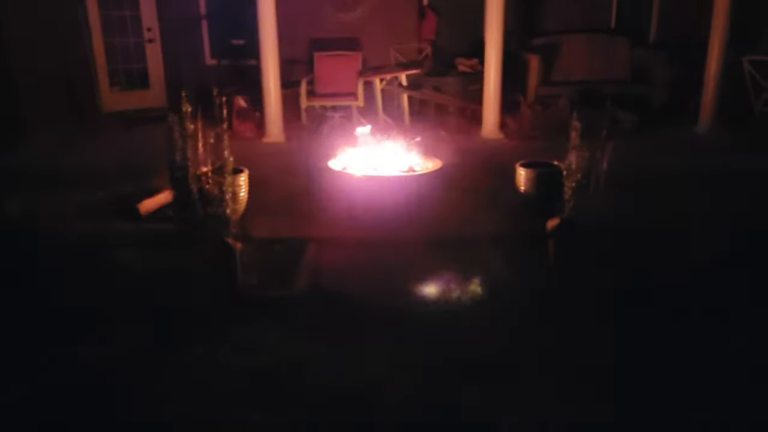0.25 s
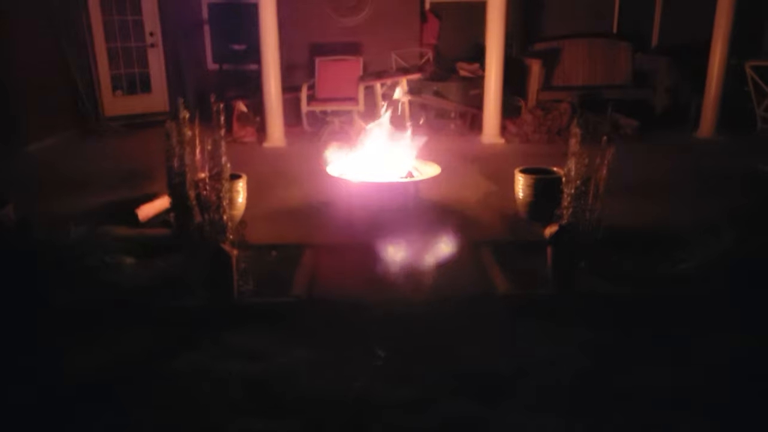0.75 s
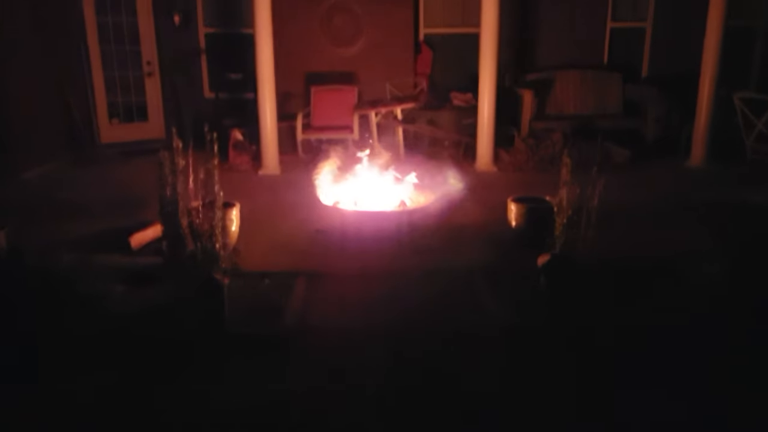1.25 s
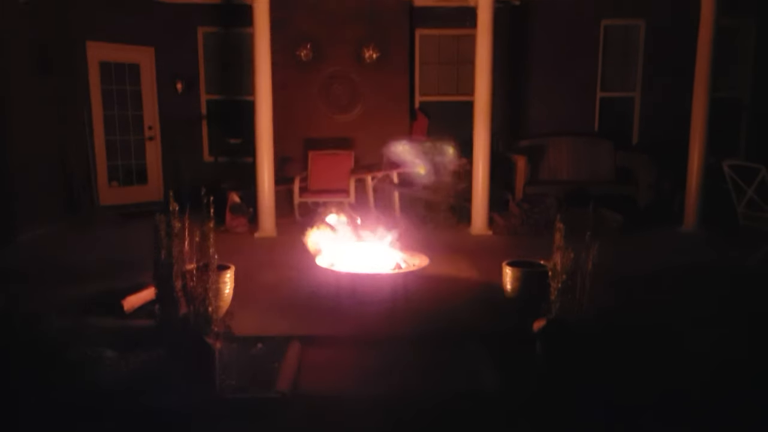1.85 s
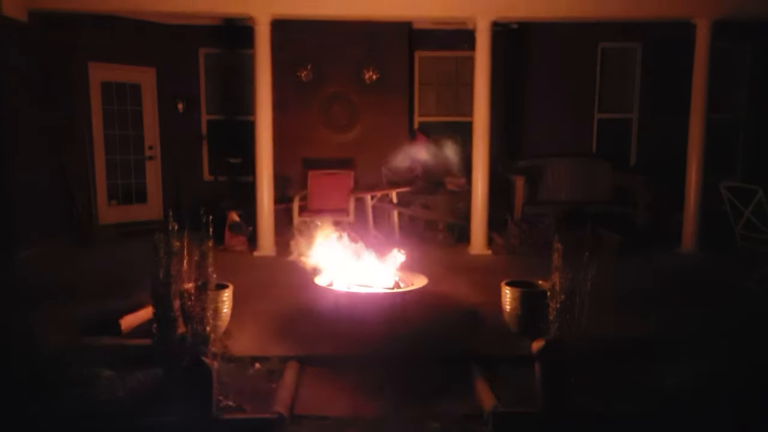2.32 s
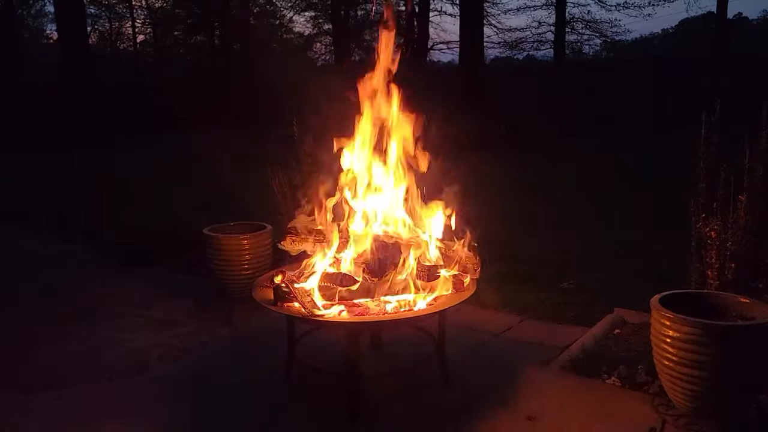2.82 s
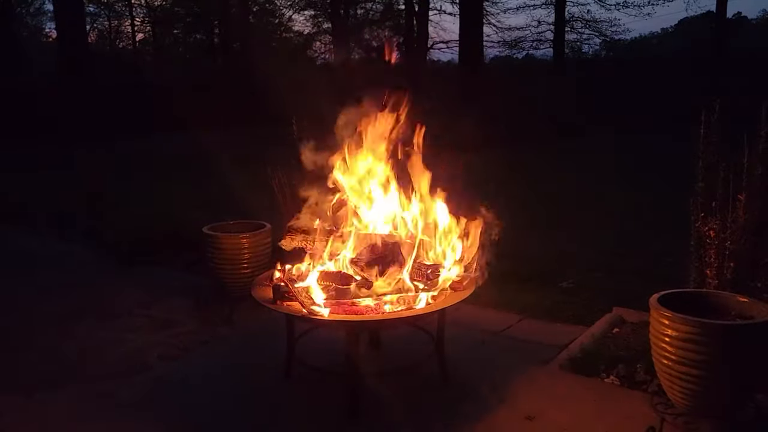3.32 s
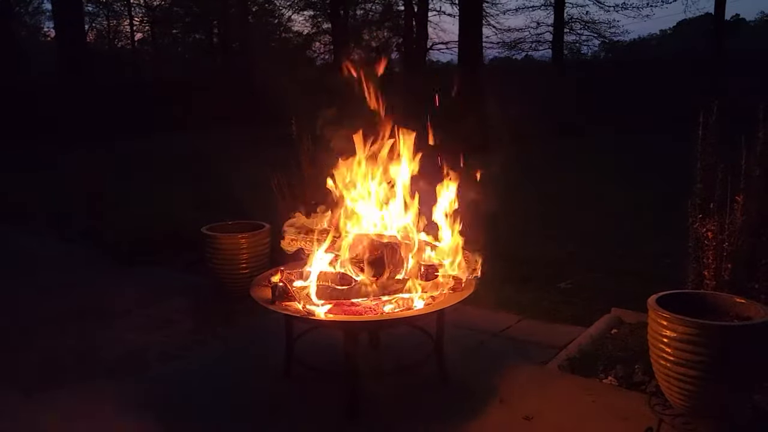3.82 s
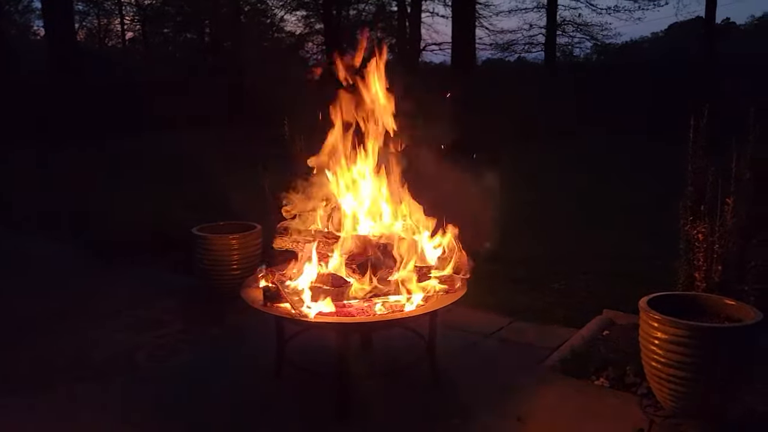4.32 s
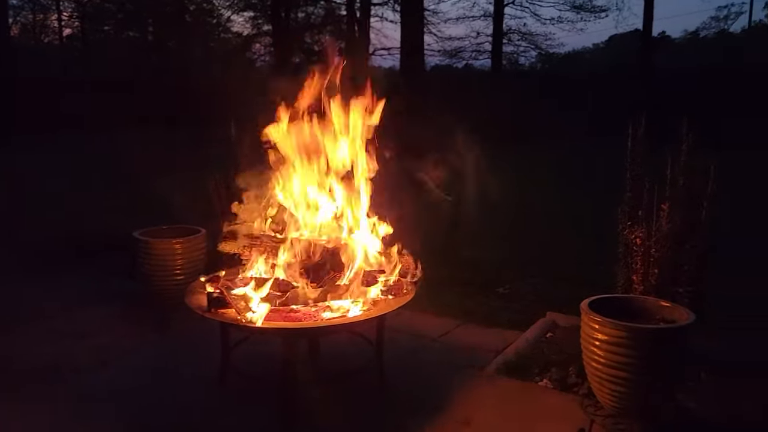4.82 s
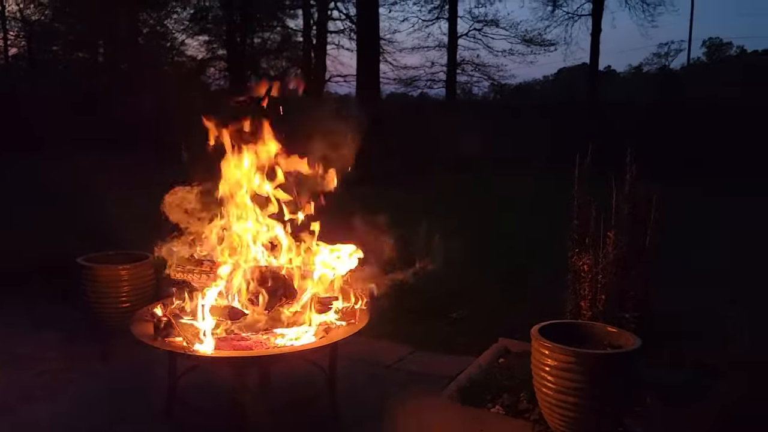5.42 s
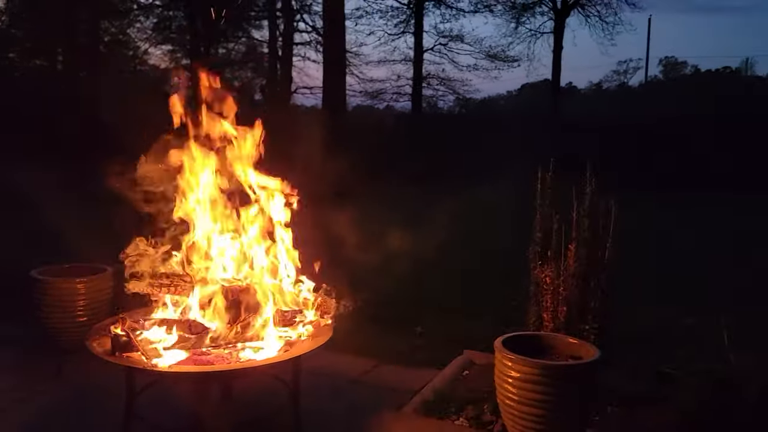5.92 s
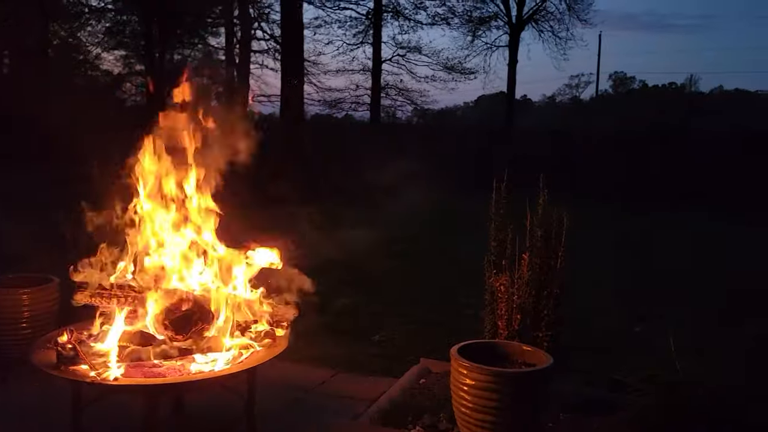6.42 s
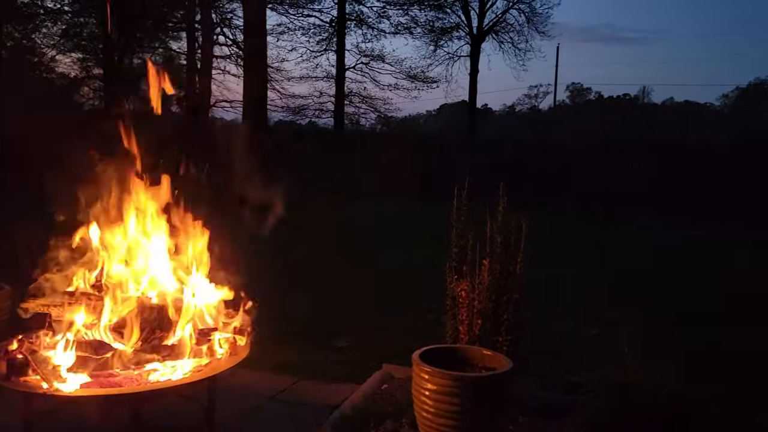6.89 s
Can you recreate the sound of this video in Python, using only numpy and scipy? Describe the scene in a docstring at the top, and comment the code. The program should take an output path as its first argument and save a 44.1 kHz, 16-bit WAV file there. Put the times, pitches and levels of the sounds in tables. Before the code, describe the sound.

Flames rumble low with gusty buffeting and a close cricket trill, then a brief hush and a closer wood fire popping over distant crickets.

```python
"""Beside a house at dusk, a wood fire burns in a metal pit: first from the lawn, then, after a brief hush, close to it.
Low noise rumbles as the flames, tiny clicks tick as embers, and pulses ringing the modes of the logs pop.
Noise jets spit steam after each pop, which bowl, patio and walls throw back; steadier noise hisses as sap.
Crickets trill in drooping tones under a blurred chorus, over a far wash of traffic.
Two microphone ports hear it all a little apart."""
import sys
import numpy as np
from scipy import signal
from scipy.fft import rfft, irfft
from scipy.io import wavfile
from scipy.ndimage import uniform_filter1d

SR = 44100
rng = np.random.default_rng(int(sys.argv[2]) if len(sys.argv) > 2 else 0)


def digitize_waveform(pressure):
    """Quantize a signal to 16-bit integers and store it at the path in sys.argv[1].

    Rows of a 2-D input are taken as channels; values are limited to [-1, 1].
    """
    field = np.atleast_2d(pressure).T
    bounded = np.clip(field, -1, 1)
    quanta = np.round(bounded * 32767).astype(np.int16)
    wavfile.write(sys.argv[1], SR, quanta)


N = 315315
TIME = np.arange(N) / SR

# pops of the wood; small pockets tick brightly, big ones knock:
# (start_s, level_db, brightness [dB per octave], steam_db [re the pop, before the shared lift in steam()])
POPS = [(2.337, -61, 16, -25), (3.0759, -39.5, -4, -17.5), (3.6303, -69, 26, -22), (4.083, -59.5, 11, -30),
        (4.1803, -63.5, 24, -27), (4.2916, -63, 16, -24), (4.3069, -47, -1, -36), (4.4851, -36.5, 2, -29.5),
        (4.5121, -49, 7, -32), (5.001, -48.5, -3, -23.5), (5.005, -63, 25, -24), (5.048, -65, 15, -31),
        (5.156, -63.5, 25, -21), (5.5183, -54, 7, -23), (5.6704, -58, 15, -28), (5.763, -55, 16, -32),
        (5.9352, -60.5, 7, -29), (6.3708, -46, 0, -24.5), (6.725, -29.5, 0, -24), (6.788, -55, 13, -23),
        (6.9052, -53.5, 4, -19.5)]


def undb(db):
    """Decibels to gain."""
    return 10 ** (np.asarray(db) / 20)


def unit(x):
    """Scale to an rms of one."""
    return x / np.sqrt(np.mean(x ** 2))


def curve(rows):
    """Gain at every sample from rows of (time_s, level_db)."""
    return undb(np.interp(TIME, *np.transpose(rows)))


def walk(rate_hz):
    """Slow chance: random levels held for 1 / rate_hz seconds, then slewed, with an rms of one."""
    hold = int(SR / rate_hz)
    steps = rng.standard_normal(N)[np.arange(N) // hold]
    slewed = uniform_filter1d(uniform_filter1d(steps, hold), hold)
    return unit(slewed)


def colour(x, spectrum):
    """Filter by a spectrum of (freq_hz, level_db) points, with steep skirts beyond its ends."""
    hz, db = np.transpose(spectrum)
    f = np.maximum(np.fft.rfftfreq(N, 1 / SR), 1)
    skirts = np.minimum(1, f / hz[0]) ** 2 * np.minimum(1, hz[-1] / f) ** 2
    gain = unit(undb(np.interp(np.log(f), np.log(hz), db)) * skirts)
    return irfft(rfft(x) * gain, N)


def band(x, low_hz, high_hz, order=2):
    """Causal band-pass."""
    edges = [low_hz, min(high_hz, SR / 2 - 1)]
    return signal.sosfilt(signal.butter(order, edges, "band", fs=SR, output="sos"), x)


def delay(x, seconds):
    """The same sound, later."""
    return np.interp(TIME - round(seconds * SR) / SR, TIME, x, left=0)


def ports(x, lag_ms, pan_db=0):
    """A sound from the left reaches the right port a little later."""
    return np.array([x * undb(pan_db / 2), delay(x, lag_ms / 1000) * undb(-pan_db / 2)])


def air(spectrum, shared, lag_ms=0, flicker_db=0):
    """Stereo noise: a share of its power comes from one direction, the rest from all around."""
    shared = np.clip(shared, 0, 1)
    directed = ports(rng.standard_normal(N), lag_ms)
    around = rng.standard_normal((2, N))
    noise = np.sqrt(shared) * directed + np.sqrt(1 - shared) * around
    return unit(colour(noise * undb(flicker_db * walk(18)), spectrum))


def scatter(x, t60):
    """Diffuse answer of many surfaces: a noise tail falling 60 dB in t60 seconds, different at each port."""
    t = TIME[:SR // 2]
    tail = rng.standard_normal((2, len(t))) * np.exp(-np.log(1000) * t / t60)
    tail = tail / np.sqrt(np.sum(tail ** 2) / 2)
    return signal.fftconvolve(x[None], tail, axes=1)[:, :N]


def bout(start_s, end_s, fade_s):
    """Fade in, hold, fade out; start and end lie halfway through the fades."""
    return np.clip(np.minimum(TIME - start_s, end_s - TIME) / fade_s + .5, 0, 1)


def with_swells(steady_db, swells):
    """Gain of a steady sound with smooth swells of (peak_s, length_s, level_db) added in power."""
    power = sum(undb(db) ** 2 * np.exp(-4 * ((TIME - peak_s) / length_s) ** 2)
                for peak_s, length_s, db in swells)
    return np.sqrt(undb(steady_db) ** 2 + power)


def pops():
    """Cracks and steam, with the cracks answered by the bowl of the pit, the patio and the walls."""
    # walls that answer a pop: (delay_s, level_db)
    echoes = [(.033, -25), (0.0904, -26), (.148, -49)]
    direct = cracks()
    walls = band(sum(undb(db) * delay(direct[0], delay_s) for delay_s, db in echoes), 2200, 12000)
    bowl = undb(-13) * scatter(direct[0], t60=.018)
    patio = undb(-16) * scatter(direct[0], t60=.13)
    return direct + steam() + bowl + patio + ports(walls, lag_ms=.3)


def cracks(split_s=.0009, splinter=.11, ground_ms=.46, ground=.45):
    """A steam pocket splits the wood: a sharp pulse and splinters ring its modes, tilted by brightness."""
    # body, crack, snap and fizz of a pop: (low_hz, high_hz)
    bands = [(200, 1450), (1650, 3500), (3700, 8600), (10800, 15700)]
    # share of each band at brightness 0: one level_db per band
    shape_db = [-1.5, 3, -1.5, -31.5]
    # left minus right, the right port hearing more of the fizz: one pan_db per band
    pan_db = [4, 5, 6.5, -10]
    # what the split wood and the pit ring with: (freq_hz, width_hz, level_db)
    modes = [(270, 190, -15.5), (757, 130, -1), (1205, 330, 0.5), (2020, 570, -4), (3230, 190, -6.5),
             (4910, 610, 8.5), (6650, 420, -6.5), (9800, 720, -7), (13850, 2100, -19)]
    # the pit drifts left as the microphone turns: (time_s, right_lag_ms)
    pit_lag = [(2.7, .02), (4.5, .03), (5.7, .07), (6.8, .14)]

    t = TIME[:SR // 40]
    out = np.zeros((2, N + SR))
    bounce = int(ground_ms * SR / 1000)
    span = .003 * SR  # every band is levelled to an rms of one over 3 ms
    wood = sum(undb(db) * width_hz * np.exp(-np.pi * width_hz * t) * np.cos(2 * np.pi * hz * t)
               for hz, width_hz, db in modes)
    rings = [band(wood, low_hz, high_hz, order=3) for low_hz, high_hz in bands]
    octaves = np.log2(np.prod(bands, axis=1)) / 2  # pitch of each band's middle
    pans = undb(np.outer([.5, -.5], pan_db))
    for start_s, db, brightness, _ in POPS:
        burst = splinter * rng.standard_normal(len(t)) * np.exp(-t / split_s)
        burst[0] += 1
        burst[bounce] += ground  # the paving reflects it at once
        parts = np.array([signal.fftconvolve(burst, ring)[:len(t)] for ring in rings])
        parts = parts * np.sqrt(span / np.sum(parts ** 2, axis=1, keepdims=True))
        shares = undb(shape_db + brightness * octaves)
        crack = undb(db) * (pans * shares / np.linalg.norm(shares)) @ parts
        left = int(start_s * SR)
        right = left + round(np.interp(start_s, *np.transpose(pit_lag)) * SR / 1000)
        out[0, left:left + len(t)] += crack[0]
        out[1, right:right + len(t)] += crack[1]
    return out[:, :N]


def steam(rise_s=0.00067, spit_s=0.047):
    """Each opened pocket spits a jet of noise for a few hundredths of a second."""
    # colour of the jet: (freq_hz, level_db [per Hz])
    spit_spectrum = [(300, -9.5), (700, -2), (1300, -0.5), (2600, -1), (3500, -3), (5200, -4.5),
                     (7000, -13), (8200, -27), (10000, -31), (15000, -32.5)]
    t = TIME[:SR // 6]
    vents = np.zeros(N)
    for start_s, db, _, steam_db in POPS:
        vents[int(start_s * SR)] = undb(db + steam_db)
    spurt = (1 - np.exp(-t / rise_s)) * np.exp(-(t / spit_s) ** 2)
    jet = signal.fftconvolve(vents, spurt)[:N]
    sputter = undb(2.5 * walk(900))
    return undb(7.5) * jet * sputter * air(spit_spectrum, shared=0.15, lag_ms=.1)


def flames_from_lawn():
    """Flames rumble as low noise, and gusts buffet the two ports unequally."""
    # gusts: (peak_s, length_s, level_db, pan_db [left minus right])
    gusts = [(.05, 0.052, -36, -1), (0.223, .08, -35, -10), (0.604, 0.37, -39, 4.5), (0.862, .09, -35, 4),
             (1.38, 0.17, -42.5, 4.5), (2.336, .12, -31, -7.5)]
    # colour of the rumble: (freq_hz, level_db [per Hz])
    roar_spectrum = [(18, -30.5), (35, -13.5), (68, 2.5), (100, -9), (150, -22), (250, -32.5), (450, -39.5),
                     (1000, -58.5)]
    gusty = []
    for side in (1, -1):
        swells = [(peak_s, length_s, db + side * pan_db / 2) for peak_s, length_s, db, pan_db in gusts]
        gusty.append(with_swells(-43.5, swells))
    return np.array(gusty) * air(roar_spectrum, shared=0.3, flicker_db=2.0)


def flames_beside_pit():
    """Flames rumble as low noise that heaves gently, nearly alike at both ports."""
    # colour of the rumble: (freq_hz, level_db [per Hz])
    roar_spectrum = [(18, -13), (35, -14.5), (55, -1.5), (72, 1), (120, -8.5), (190, -15.5), (300, -26),
                     (450, -50.5), (1000, -67)]
    heave = undb(-49 + 1.0 * walk(5))
    return heave * air(roar_spectrum, shared=0.96, flicker_db=0.03) * undb([[-.3], [.3]])


def embers(db):
    """Tiny ticks, about 70 a second, most of them faint: random clicks smeared over a millisecond."""
    # colour of the ticks: (freq_hz, level_db [per Hz])
    tick_spectrum = [(900, -18), (2000, -2), (3400, -13.5), (5200, 10), (7000, -4), (8200, -22.5),
                     (10000, -14), (15000, -12.5)]
    size = undb(3.5 * np.minimum(rng.exponential(size=N), 3))
    clicks = (rng.random(N) < 70 / SR) * size
    return undb(db) * unit(colour(scatter(clicks, t60=0.0012), tick_spectrum))


def sizzle(loudness, hiss_db, pan_db, top_db, top_pan_db):
    """Sap hisses as noise: more middle treble at the left port, more of the flickering very top at the right."""
    # colour of the hiss: (freq_hz, level_db [per Hz])
    hiss_spectrum = [(2000, -5), (3400, -4.5), (4700, -6.5), (5600, -0.5), (6700, -6), (7400, -12),
                     (8200, -56), (9500, -20), (11500, -32), (15500, -24)]
    top_spectrum = [(8500, -27.5), (10500, 2.0), (13000, 4.5), (15500, 7.0)]
    hiss = undb(hiss_db) * air(hiss_spectrum, shared=0.069, lag_ms=.1)
    top = undb(top_db) * air(top_spectrum, shared=0) * undb(1.4 * walk(300))
    hiss = hiss * undb([[pan_db / 2], [-pan_db / 2]])
    top = top * undb([[top_pan_db / 2], [-top_pan_db / 2]])
    return loudness * (hiss + top)


def sap_from_lawn():
    """Sap hisses steadily and boils up in short flares."""
    # flares, before the balance of hiss and top: (peak_s, length_s, level_db)
    flares = [(.35, .3, -75.5), (0.703, 0.15, -77.5)]
    return sizzle(with_swells(-82.5, flares), hiss_db=6, pan_db=8.5, top_db=-8, top_pan_db=-11)


def cricket(loudness, hz, strokes_hz, droop_hz, rough, wet_db, lag_ms):
    """Each wing stroke scrapes out a short tone that holds, then droops as the wing slows."""
    stroke = np.cumsum(strokes_hz * (1 + .05 * walk(25))) / SR % 1  # place within the stroke, 0 to 1
    pitch = hz - droop_hz * stroke ** 4 + rough * hz * walk(700)
    teeth = undb(2.9 * walk(500))  # the scraper grips the file unevenly
    swing = np.sin(np.pi * stroke ** 0.72) ** 1.3
    tone = swing * teeth * np.sin(2 * np.pi * np.cumsum(pitch) / SR)
    song = unit(tone * undb(1.1 * walk(30))) * loudness
    wet = undb(wet_db)
    return (ports(song, lag_ms) + wet * scatter(song, t60=0.1)) / np.hypot(1, wet)


def nearest_cricket():
    """One cricket sings close by in separate trills."""
    # trills: (start_s, end_s, level_db)
    trills = [(-.05, 1.11, -55.5), (1.725, 1.795, -57), (2.08, 2.46, -57.5)]
    loudness = sum(undb(db) * bout(start_s, end_s, fade_s=0.027) for start_s, end_s, db in trills)
    return cricket(loudness, hz=4220, strokes_hz=45, droop_hz=800, rough=.011, wet_db=-5.5, lag_ms=.49)


def further_crickets():
    """Crickets further off, each with its own pitch and wing rate, blurred more by their surroundings."""
    # trills: (start_s, end_s, level_db, pitch_hz, strokes_hz, droop_hz, roughness [0-1 of the pitch])
    trills = [(2.55, 3.6, -74, 4375, 37, 350, .009), (2.68, 4.3, -70.5, 4105, 41, 400, .009),
              (5.15, 7.3, -71.5, 4395, 37, 350, .008), (5.5, 7.3, -77, 3930, 36, 500, .018),
              (6.3, 7.3, -68.5, 4070, 42, 700, .022)]
    singers = 0
    for start_s, end_s, db, hz, strokes_hz, droop_hz, rough in trills:
        loudness = undb(db) * bout(start_s, end_s, fade_s=0.2)
        singers = singers + cricket(loudness, hz, strokes_hz, droop_hz, rough, wet_db=-2, lag_ms=.26)
    return singers


def chorus(loudness, spectrum, shared, lag_ms, flicker_db):
    """Many distant crickets blur into a flickering band of noise around their pitch."""
    return loudness * air(spectrum, shared, lag_ms, flicker_db)


def traffic(db, spectrum, shared, lag_ms):
    """Far traffic merges into a steady wash of noise with little treble."""
    return undb(db) * air(spectrum, shared, lag_ms)


def from_lawn():
    """Facing the house: gusts ride on the rumble of the flames and one cricket sings close by."""
    # colours of traffic and distant chorus: (freq_hz, level_db [per Hz])
    traffic_spectrum = [(120, 3.5), (300, -6), (450, -6), (780, -1), (1100, 1), (1600, -8.5), (2500, -13.5),
                        (3300, -21.5), (4500, -32.5)]
    chorus_spectrum = [(3200, -53), (3650, -8), (3900, -3.5), (4350, 5), (4600, 0.5), (5000, -9.5),
                       (5600, -46.5)]
    fire = flames_from_lawn()
    wash = traffic(-53.5, traffic_spectrum, shared=0.79, lag_ms=0.47)
    distant = chorus(undb(-65.0), chorus_spectrum, shared=0.12, lag_ms=0.55, flicker_db=0.5)
    return fire + wash + distant + nearest_cricket() + sap_from_lawn() + embers(db=-79)


def beside_pit():
    """Close to the fire, facing the trees: steady flames and crickets further off."""
    # colours of traffic and distant chorus: (freq_hz, level_db [per Hz])
    traffic_spectrum = [(120, 1), (300, 1.5), (460, -7.5), (720, -0.5), (1200, 2.5), (2000, -9),
                        (2600, -13.5), (3300, -23.5), (4500, -58)]
    chorus_spectrum = [(3200, -62), (3600, -9.5), (3850, 1), (4100, -2.5), (4400, 2.5), (4700, -4),
                       (5400, -28)]
    # the chorus thins out and swells again: (time_s, level_db)
    chorus_swell = [(2.66, -64), (3.6, -66), (4.4, -65.5), (5.3, -68), (6.0, -66), (7.15, -64)]
    fire = flames_beside_pit()
    wash = traffic(-57.0, traffic_spectrum, shared=0.49, lag_ms=0.45)
    distant = chorus(curve(chorus_swell), chorus_spectrum, shared=0.66, lag_ms=0.36, flicker_db=3.3)
    singers = further_crickets()
    sap = sizzle(undb(-82), hiss_db=6, pan_db=10.0, top_db=-1.5, top_pan_db=-4.5)
    return fire + wash + distant + singers + sap + embers(db=-85.5)


def scene():
    """The two places in turn, with the pops of the wood over both."""
    first_end_s, second_start_s = 2.432, 2.656
    first = np.clip((first_end_s - TIME) / .002, 0, 1)
    second = np.clip((TIME - second_start_s) / 0.0067, 0, 1)
    return from_lawn() * first + beside_pit() * second + pops()


def record(dry):
    """The microphone is deaf in a narrow band near 8 kHz and cuts the top above 15.85 kHz."""
    heard = signal.lfilter(*signal.iirnotch(8200, 7, fs=SR), dry)
    return signal.sosfilt(signal.ellip(10, .2, 70, 15850, fs=SR, output="sos"), heard)


dry = scene()
out = record(dry)
digitize_waveform(out)
```